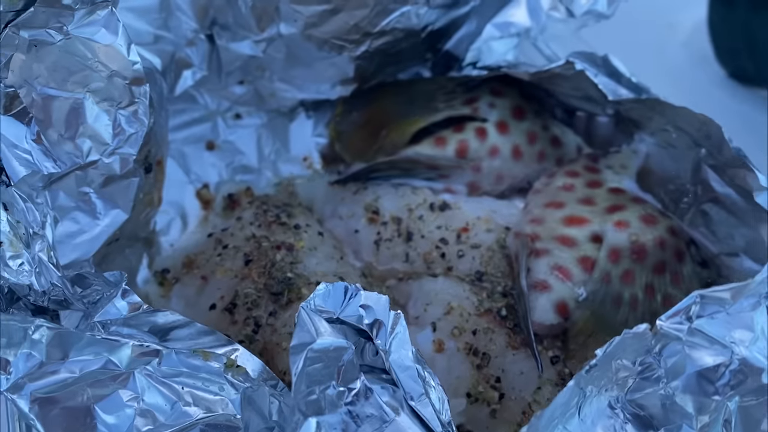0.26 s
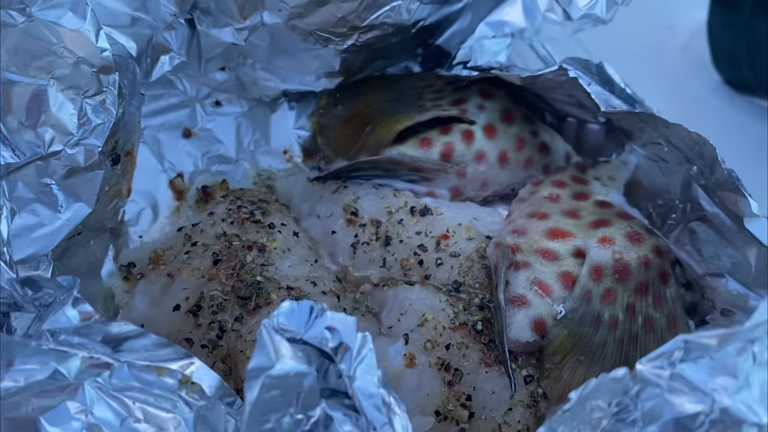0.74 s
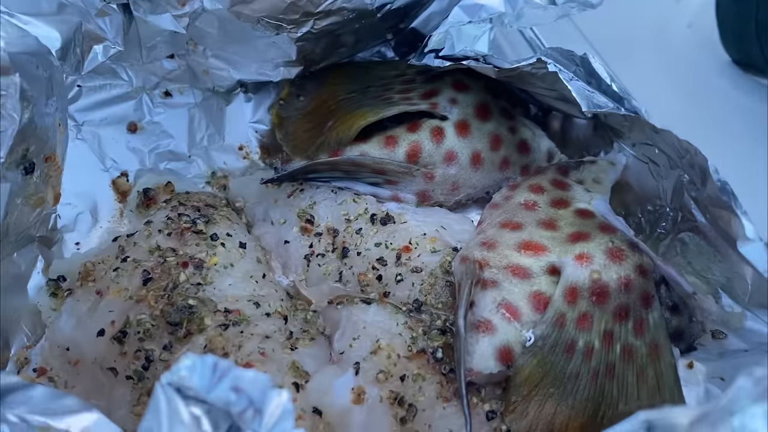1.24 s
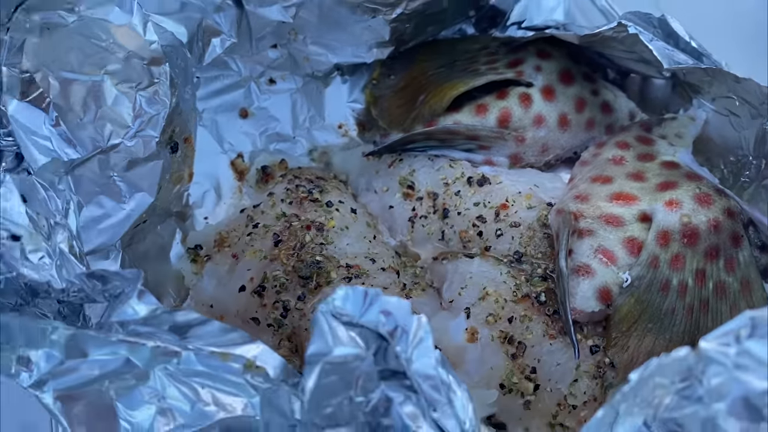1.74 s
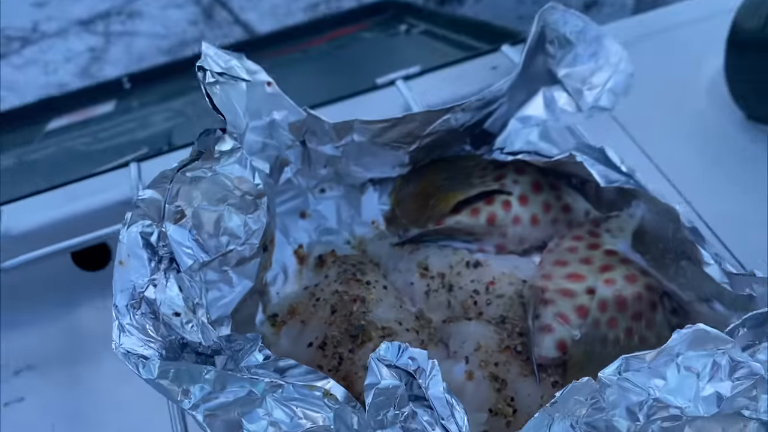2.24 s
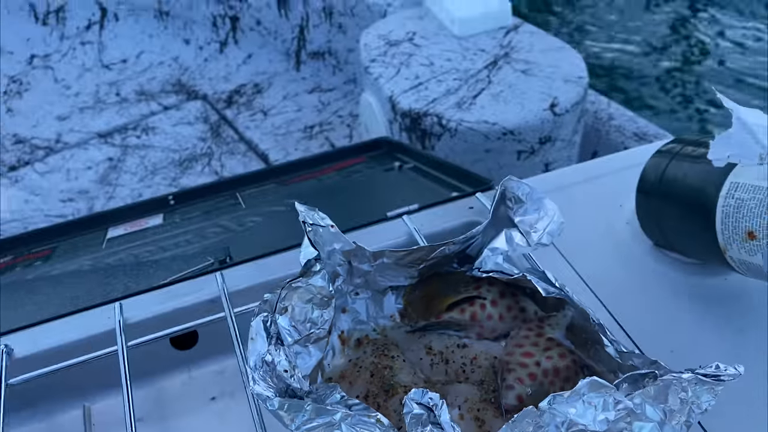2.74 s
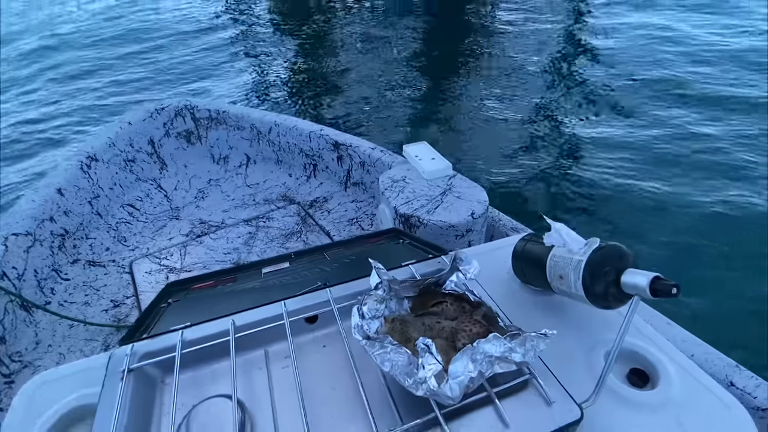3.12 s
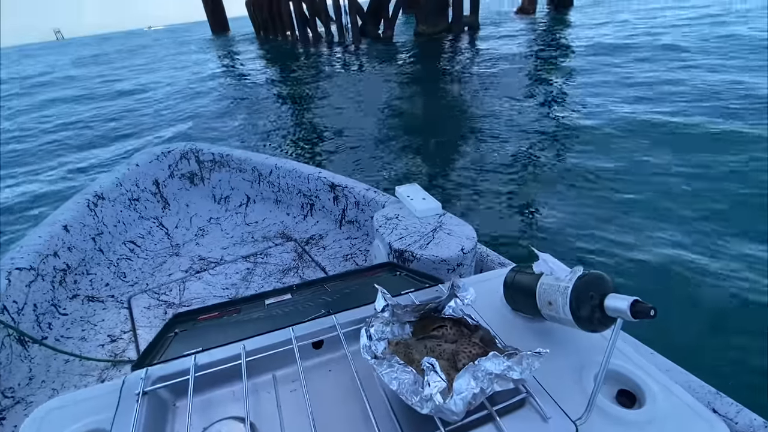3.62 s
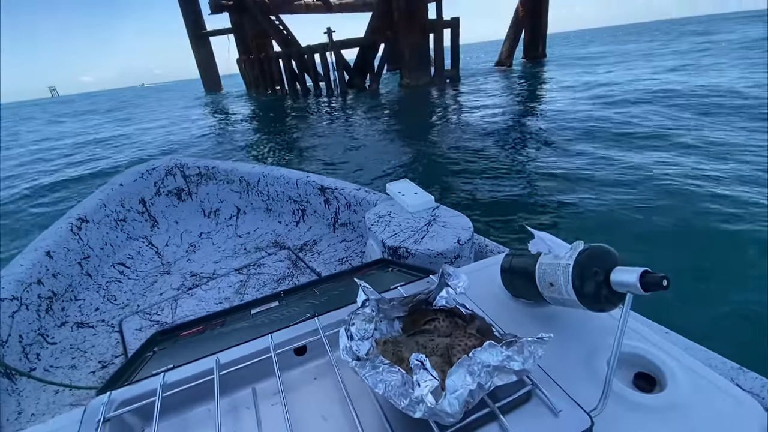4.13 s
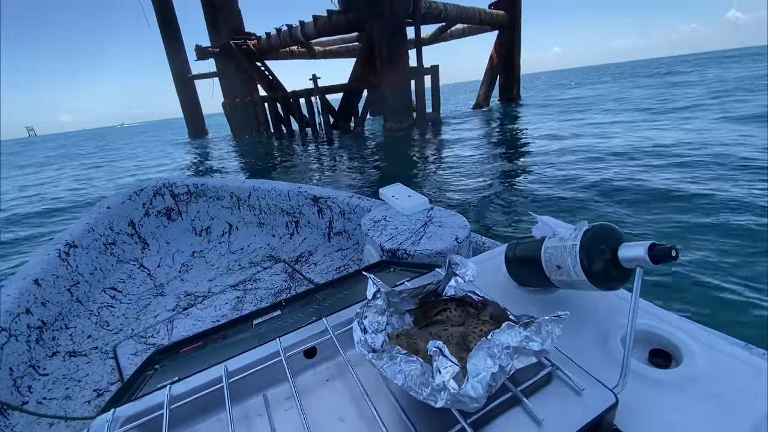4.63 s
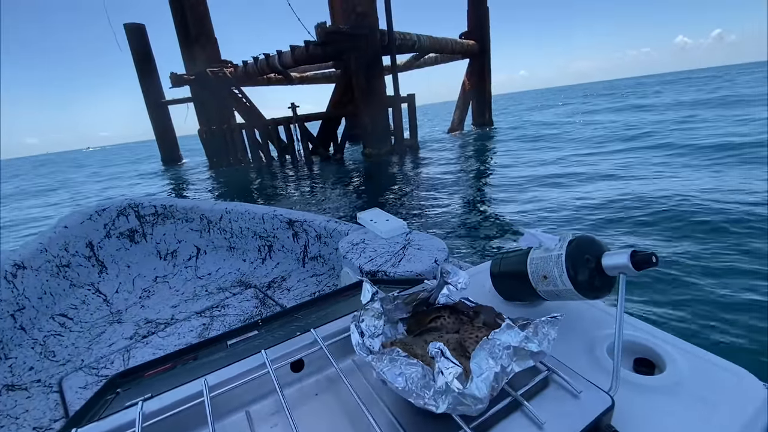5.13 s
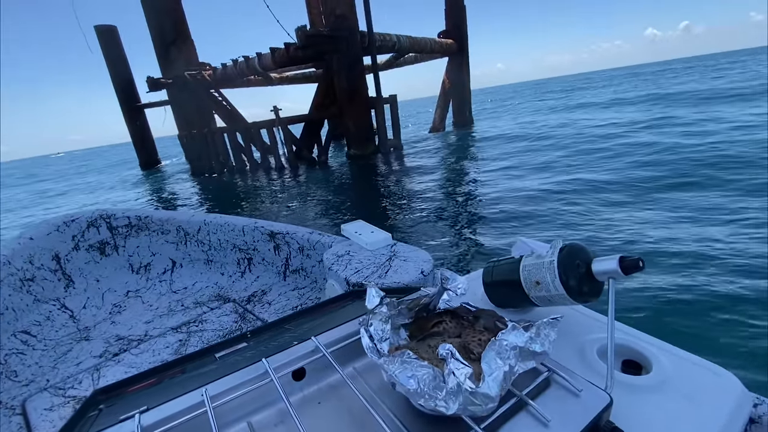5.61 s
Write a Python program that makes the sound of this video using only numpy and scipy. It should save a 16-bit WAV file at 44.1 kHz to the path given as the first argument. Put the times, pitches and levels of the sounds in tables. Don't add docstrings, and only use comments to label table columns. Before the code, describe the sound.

Close handheld phone capture outdoors on a boat deck: dense, bubbling sizzle over a steady gas-jet hiss, dotted with dull spits and bright fat snaps. Soft wind thumps come and go. A tiny dropout cuts the sound near 1.6 seconds. Then the microphone retreats, leaving a quieter, slightly hollow roar, altered stereo, sparse crackles and tiny drips, with the hiss partly recovering by the end.

```python
import sys
import numpy as np
from scipy import signal
from scipy.io import wavfile
from scipy.ndimage import uniform_filter1d

SR = 44100
rng = np.random.default_rng(int(sys.argv[2]) if len(sys.argv) > 2 else 0)


def generate_wav(signal):
    frames = np.transpose(np.atleast_2d(signal))
    scaled = np.clip(frames, -1, 1) * 32767
    pcm = np.round(scaled).astype(np.int16)
    wavfile.write(sys.argv[1], SR, pcm)


def field_ratio(decibels):
    return 10 ** (np.asarray(decibels, dtype=float) / 20)


N = 258677
SIZE, HOP = 2048, 512
SWITCH_S = 2.9


def evened(x):
    return x / np.sqrt(np.mean(np.abs(x) ** 2) + 1e-20)


def spectrum(x):
    return signal.stft(x, SR, nperseg=SIZE, noverlap=SIZE - HOP)


def waveform(z):
    return signal.istft(z, SR, nperseg=SIZE, noverlap=SIZE - HOP)[1][:, :N]


def read(table, hz):
    f, *columns = np.transpose(table)
    curves = [np.interp(np.log(hz + 1), np.log(f + 1), c) for c in columns]
    return np.array(curves)[:, :, None]


def follow(table, t):
    s, *columns = np.transpose(table)
    return [np.interp(t, s, c) for c in columns]


# (time [s], length [s], level above calm [dB])
GUST_SWELLS = [(.29, .08, 8.1), (.55, 0.028, 3.4), (.8, 0.13, 9), (1.0, 0.042, 6), (1.25, 0.083, 13),
               (1.5, 0.093, 12), (1.72, 0.11, 10), (1.9, 0.086, 7.7), (2.08, 0.027, 18), (2.22, 0.075, 11),
               (2.45, 0.053, 2.6), (3.6, 0.059, 6), (5.5, .1, 3)]
CALM_DB = -60.5


def breeze(t):
    swells = [db * np.exp(-.5 * ((t - s) / length) ** 2) for s, length, db in GUST_SWELLS]
    return CALM_DB + sum(swells)


# (time [s], level [dB])
JET_REACH = [(0, -35), (0.6, -35), (1.2, -35), (1.7, -35), (2.1, -37.5), (2.45, -41), (2.75, -43.5),
             (3.05, -43.5), (3.45, -46), (4.1, -45), (4.3, -45), (4.55, -42.5), (5.2, -42.5), (5.87, -41.5)]
REACH_NEAR_DB = -35
ROAR_NEAR_DB, ROAR_FOLLOWS = -42, .62
BRIGHT_NEAR_DB, BRIGHT_FAR_DB, BRIGHT_FOLLOWS = -0.3, 2.5, 0.96
FADE_S, FADE_HISS_DB, FADE_ROAR_DB, FADE_BREEZE_DB = 0.31, -8.5, -9, -17


def levels(t):
    reach_db, = follow(JET_REACH, t)
    away_db = reach_db - REACH_NEAR_DB
    unfaded = np.clip(1 - t / FADE_S, 0, 1)
    hiss_db = reach_db + FADE_HISS_DB * unfaded
    roar_db = ROAR_NEAR_DB + ROAR_FOLLOWS * away_db + FADE_ROAR_DB * unfaded ** 1.5
    breeze_db = breeze(t) + FADE_BREEZE_DB * unfaded
    far_bright_db = BRIGHT_FAR_DB + BRIGHT_FOLLOWS * (away_db + 2.5)
    bright_db = np.where(t < SWITCH_S, BRIGHT_NEAR_DB, far_bright_db)
    return hiss_db, roar_db, breeze_db, bright_db


# (frequency [Hz], left level [dB], right level [dB])
NEAR_SPECTRUM = [(30, 2, 0), (60, 9, 11), (134, 4, 1), (260, 6.5, 3.5), (380, 1.5, 0), (586, 7.5, -3),
                 (954, 4, -9), (1540, -5.5, -6.5), (2000, -3.7, -5.5), (3440, -5, -10), (4970, -0.1, -10),
                 (5900, -4, -7), (7500, -3, -3.5), (16000, -8, -8)]
FAR_SPECTRUM = [(30, 3, -5), (60, -5.5, -7.5), (133, -6, -8.5), (262, -1, -0.5), (414, -5, -8.5),
                (596, 4, -4), (1000, -5.5, -10), (1690, -11.5, -9), (2030, -6, -5.5), (3250, -8, -9),
                (4880, -11, -18), (6500, -5.5, -7.5), (7650, -7.5, -11.5), (15500, -13.5, -11.5)]
# (frequency [Hz], width [Hz], near
# level [dB], far level [dB])
PEAKS_AND_DIPS = [(266, 50, 2.5, 5), (2000, 30, 4, -3), (2450, 110, 1.5, -2), (4600, 340, 1, 3.5),
                  (5200, 310, -1.6, 5.5), (414, 23, -0.5, -3.5), (880, 57, 0.6, 1), (970, 30, 1.2, -4),
                  (1520, 28, -0.5, 0), (3040, 140, 0.5, 2.5)]


def path_colour(f, far, echo_ms, echo):
    hz = f[:, 0]
    colour = field_ratio((1 - far) * read(NEAR_SPECTRUM, hz) + far * read(FAR_SPECTRUM, hz))
    reflected = echo * np.exp(-f / 5000) * np.exp(1.6j - 2j * np.pi * f * echo_ms / 1000)
    colour = colour * (1 + reflected)
    for centre_hz, width_hz, near_db, far_db in PEAKS_AND_DIPS:
        peak_db = (1 - far) * near_db + far * far_db
        colour *= field_ratio(peak_db * np.exp(-.5 * ((f - centre_hz) / width_hz) ** 2))
    return colour / (1 + (45 / (f + 1)) ** 6)


# (frequency [Hz], likeness [0-1], lead of the right port [rad])
NEAR_PORTS = [(30, .85, -.2), (130, .82, -.2), (280, .98, -.4), (480, .87, -1.2), (700, .93, -.7),
              (1000, .85, -.9), (1300, .2, -2.8), (1650, .65, -3.3), (2050, .65, -5.2), (2400, .88, -6.2),
              (2750, .35, -7.2), (3900, .78, -6.5), (4900, .55, -6.4), (5800, .1, -6.4)]
FAR_PORTS = [(40, .3, -1.0), (130, .88, -.4), (260, .99, -.3), (460, .65, -1.5), (620, .95, -.8),
             (900, .95, -1.0), (1050, .6, -1.4), (1300, .85, -1.4), (1600, .2, -2.2), (2000, .8, -3.1),
             (2300, .3, -3.3), (2800, .5, -3.1), (4100, .4, -6.0), (7500, .15, -5.0)]
FOLD_NEAR_HZ, FOLD_FAR_HZ = 6300, 9000
IN_STEP_HZ, COMB_HZ, FOLD_SAME = 11150, 4150, .88


def port_pair(a, b, f, t):
    hz, close = f[:, 0], t < SWITCH_S
    same, lead = np.where(close, read(NEAR_PORTS, hz), read(FAR_PORTS, hz))
    fold_hz = np.where(close, FOLD_NEAR_HZ, FOLD_FAR_HZ)
    fold = 1 / (1 + np.exp((fold_hz - f) / np.where(close, 150, 600)))
    same = np.clip(same + (FOLD_SAME - same) * fold, 0, 1)
    phase = np.where(fold > .5, 2 * np.pi * (f - IN_STEP_HZ) / COMB_HZ, lead)
    return np.array([a, np.exp(1j * phase) * same * a + np.sqrt(1 - same ** 2) * b])


# (time [s], distance [0 near - 1 far], deck echo [ms], echo share [0-1],
# lift of the upper roar [dB])
PHONE_PATH = [(0, 0, 0.69, 0.15, -1.3), (1.0, 0, 0.65, 0.18, 1.3), (2.0, 0.13, 0.83, 0.024, 0),
              (2.6, 0.37, 2.15, 0.049, 2), (3.0, 0.84, 2.2, 0.29, 1), (3.4, 0.96, 1.88, 0.35, 0.5),
              (3.8, 0.95, 1.82, 0.31, 0), (4.2, 0.93, 1.62, 0.27, 1.5), (4.7, 0.94, 1.66, 0.21, 0),
              (5.0, 0.8, 1.64, 0.3, 4.5), (5.87, 0.66, 1.72, 0.29, 3.5)]


def burner():
    hz, t, fizzy = spectrum(sizzle())
    smooth = spectrum(rng.standard_normal((2, N)))[2]
    f = hz[:, None]
    hiss_db, roar_db, breeze_db, bright_db = levels(t)
    far, echo_ms, echo, lift_db = follow(PHONE_PATH, t)
    colour = path_colour(f, far, echo_ms, echo)
    high = 1 / (1 + (1350 / (f + 1)) ** 6)
    low = 1 / (1 + (f / 130) ** 6)
    gain = np.zeros(colour.shape[1:])
    for share, db in ((high, hiss_db), (1 - high - low, roar_db), (low, breeze_db)):
        power = (np.abs(colour) ** 2 * share).mean((0, 1))
        gain += np.clip(share, 0, 1) * field_ratio(2 * db) / power
    treble_db = bright_db * np.exp(-((f - 8000) / 2200) ** 2)
    upper_roar_db = lift_db * np.exp(-((f - 1150) / 350) ** 2)
    gain = np.sqrt(gain) * field_ratio(treble_db + upper_roar_db)
    patches = rng.standard_normal(gain.shape)
    patches = evened(uniform_filter1d(uniform_filter1d(patches, 40, 0), 4, 1))
    a, b = np.sqrt(high) * fizzy + np.sqrt(1 - high) * smooth
    return waveform(port_pair(a, b, f, t) * colour * gain * field_ratio(1.03 * patches + 4.5))


# (time [s], level [dB])
BOIL_SURGES = [(.29, 0.5), (.56, 2.2), (.69, 5), (.81, 1.5), (.93, 2), (1.08, 3.5), (1.5, 1), (1.64, 0.5),
               (1.73, -2.5), (2.2, 0), (2.27, 2), (2.66, -1), (2.76, -1.5), (3.04, 3.5), (3.54, 2.5),
               (3.8, 3), (4.18, 3.5), (4.46, -1.5), (4.62, 0.5), (5.15, 0), (5.31, -1.5), (5.55, 1.5)]
SURGE_RISE_S, SURGE_FALL_S, SURGE_LEAD_S, SURGE_BITE = 0.0052, 0.027, 0.013, 1.17


def surges():
    start_s, db = np.transpose(BOIL_SURGES)
    since = np.maximum(np.arange(N)[:, None] / SR - start_s + SURGE_LEAD_S, 0)
    shape = (1 - np.exp(-since / SURGE_RISE_S)) * np.exp(-since / SURGE_FALL_S)
    return field_ratio(SURGE_BITE * shape @ db)


def bursts(per_s, spread_db, decay_s):
    happens = rng.random(N) < per_s / SR
    size = field_ratio(spread_db * np.minimum(rng.exponential(1, N), 2.6)) * happens
    r = np.exp(-1 / (decay_s * SR))
    return signal.lfilter([1], [1, -r], size)


def sizzle():
    swarm = bursts(45., 3.2, 0.0044)
    fizz = bursts(400., 3.7, 0.00027)
    swarm, fizz = swarm / swarm.mean(), fizz / fizz.mean()
    swarm = 4.2 * np.tanh(swarm / 4.4)
    strength = np.sqrt(0.69 + 0.2 * swarm + 0.13 * fizz * swarm)
    return evened(strength * surges() * rng.standard_normal((2, N)))


# (time [s], peak level [dB], frequency [Hz])
JUICE_SPITS = [(0.0228, -27.5, 2470), (0.2468, -23, 2000), (0.2723, -27, 1990), (0.2937, -12.5, 2250),
               (0.377, -26, 3320), (0.4179, -25, 2480), (0.4599, -21, 2420), (0.4798, -24, 2340),
               (0.5117, -20, 2070), (0.5472, -31, 2450), (0.6759, -24, 1780), (0.735, -20, 2200),
               (0.8145, -19, 2440), (0.9113, -21, 2720), (0.9373, -20, 2790), (0.9732, -22, 2270),
               (1.1937, -24, 2450), (1.2196, -25, 1990), (1.278, -29, 2020), (1.3414, -33, 2150),
               (1.49, -21, 2100), (1.5165, -20, 2010), (1.6392, -25, 2110), (1.7519, -30, 2330),
               (2.0837, -28, 3100), (2.2962, -26, 2000), (2.6823, -27, 3100), (2.7591, -28, 3550),
               (3.8506, -31.5, 3280), (4.1759, -29, 2580)]
# (time [s], peak level [dB], frequency [Hz])
FAT_SNAPS = [(0.1221, -22, 4500), (0.2718, -30, 7600), (0.2932, -20, 6660), (0.4798, -14, 4570),
             (0.5492, -13, 6700), (0.8135, -17, 7450), (0.9378, -23, 7640), (1.0675, -20, 7100),
             (1.1204, -24, 6870), (1.1742, -18, 4270), (1.489, -15.5, 6660), (1.5833, -11.5, 7600),
             (1.6342, -24, 6260), (1.726, -15, 7040), (2.1984, -23, 4040), (2.2692, -25, 6350),
             (2.5277, -26, 6610), (2.6579, -24, 6550), (2.8544, -28, 4600), (4.4667, -27, 5830),
             (4.5181, -30, 5880), (4.6194, -26, 4550), (4.7731, -27, 6210), (5.3113, -23.5, 6320),
             (5.3642, -30, 4310), (5.5498, -32, 7420)]
# (time [s], peak level [dB], frequency [Hz])
FOIL_DRIPS = [
    (2.4848, -31, 1400),
    (2.7581, -33, 1900),
    (4.0775, -34.5, 1280),
    (4.2877, -34.5, 1420),
    (4.4238, -37, 1400),
]
SPIT_MS, SNAP_MS, DRIP_MS = 3.32, 1.56, 8.2


def spits():
    length = 1200
    out, t = np.zeros(N + length), np.arange(length) / SR
    modes = ((.82, 0.24), (1.0, 0.89), (1.4, 0.42), (1.75, 0.29))
    for table, ms in ((JUICE_SPITS, SPIT_MS), (FAT_SNAPS, SNAP_MS), (FOIL_DRIPS, DRIP_MS)):
        u = t / (ms * 0.00025)
        swell = u ** 2 * np.exp(2 - 2 * u ** 0.75)
        since_peak = t - ms * 0.000361
        for s, db, hz in table:
            crack = 1.36 * uniform_filter1d(rng.standard_normal(length), size=2)
            ring = sum(g * np.cos(2 * np.pi * k * hz * since_peak) for k, g in modes)
            start = round(s * SR)
            out[start:start + length] += field_ratio(db - 4.0) * swell * (ring + 0.53 * crack) / 2
    return out[:N]


def scene():
    return burner() + spits() * field_ratio(np.array([[1.5], [-1.5]]))


# (low edge [Hz], high edge [Hz], share of blocks dropped near [0-1], far [0-1])
WEAK_SUM = [(1760, 1850, 0, .05), (1930, 2040, 0, .1), (2420, 2560, 0, .05), (2620, 2800, 0, .07),
            (3230, 3330, .02, .08), (3420, 3520, .02, .08), (7400, 7550, 0, .12), (8150, 8300, .03, .12),
            (8650, 9600, .97, .33), (12950, 13700, 1, 1)]
WEAK_DIFFERENCE = [(2250, 2420, .3, 0), (2900, 3080, .12, .04), (3500, 3700, .15, .05), (6500, 7500, .8, 0),
                   (10450, 11650, 1, 1), (15050, 17000, 1, 1)]
# (time [s], length [s], frequency [Hz])
PORT_NULLS = [(2.84, .11, 2720), (2.96, .06, 2010), (2.99, .03, 2300), (3.0, .12, 2740), (3.16, .03, 2600),
              (3.66, .08, 2970), (3.9, .11, 1830), (4.01, .06, 1970), (4.69, .06, 2000), (4.84, .09, 1990),
              (5.15, .05, 2720), (5.44, .02, 1980), (5.53, .03, 2720), (5.62, .03, 2650), (5.8, .06, 2470)]
NULL_WIDTH = .085
EDGE_HZ = 15780


def thinned(x):
    hz, t, z = spectrum([x[0] + x[1], x[0] - x[1]])
    f = hz[:, None]
    block = np.arange(len(t)) * HOP // 1024
    keep = np.ones(z.shape) * (f < EDGE_HZ)
    for side, bands in enumerate((WEAK_SUM, WEAK_DIFFERENCE)):
        for low_hz, high_hz, near, far in bands:
            chance = rng.random(len(t))[block * 2 // 3]
            edge = rng.random(len(t))[block]
            step_hz = min(340, (high_hz - low_hz) / 2)
            ragged_hz = low_hz + step_hz * (1. * (edge > .7) - (edge < .15))
            dropped = chance < np.where(t < SWITCH_S, near, far)
            keep[side] *= 1 - dropped * (f > ragged_hz) * (f < high_hz)
    for start, length, centre_hz in PORT_NULLS:
        in_band = abs(hz / centre_hz - 1) < NULL_WIDTH / 2
        in_time = (t > start - .01) & (t < start + length + .01)
        keep[0][np.ix_(in_band, in_time)] = 0
    total, difference = waveform(z * keep)
    return np.array([total + difference, total - difference]) / 2


def band_limit(x):
    return signal.sosfilt(signal.butter(12, 17070, fs=SR, output="sos"), x)


LOST_BLOCK = 1.6029, 1.6316


def record(dry):
    t = np.arange(N) / SR
    kept = (t < LOST_BLOCK[0]) | (t > LOST_BLOCK[1])
    finished = thinned(dry) * uniform_filter1d(1. * kept, size=32)
    return band_limit(finished)


dry = scene()
out = record(dry)
generate_wav(out)
```